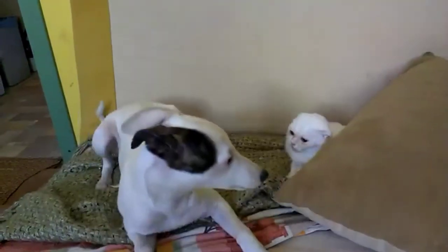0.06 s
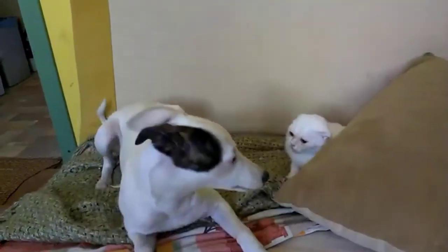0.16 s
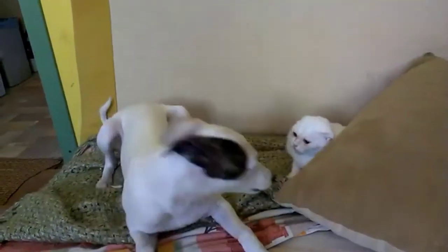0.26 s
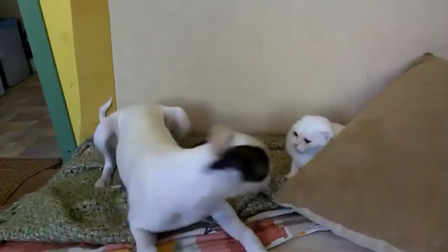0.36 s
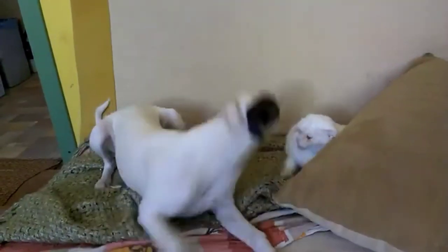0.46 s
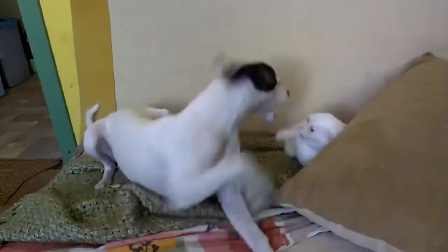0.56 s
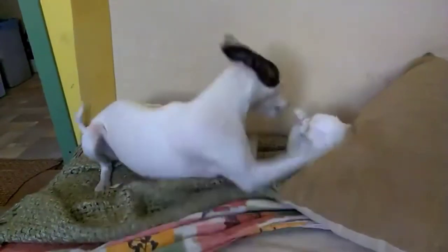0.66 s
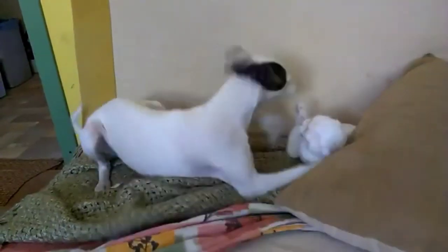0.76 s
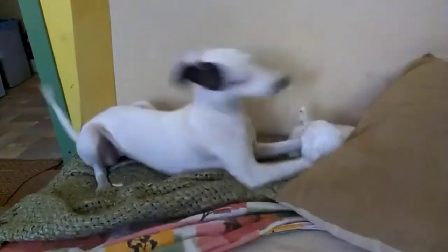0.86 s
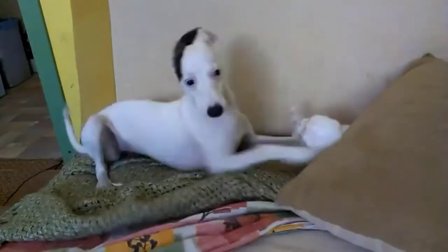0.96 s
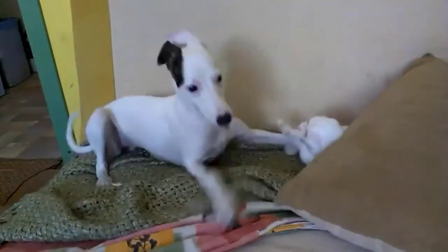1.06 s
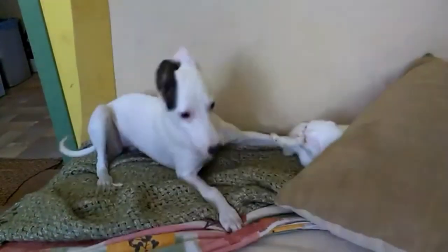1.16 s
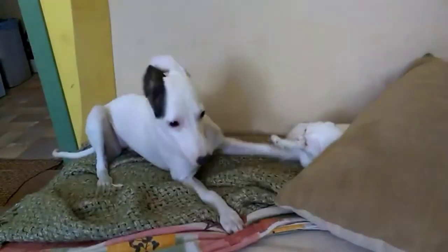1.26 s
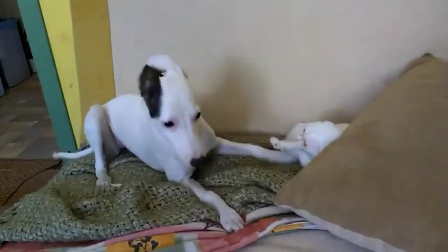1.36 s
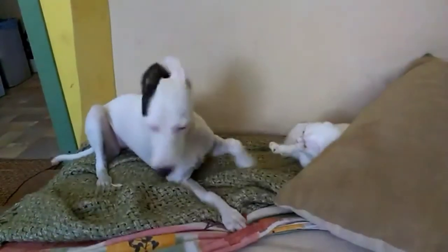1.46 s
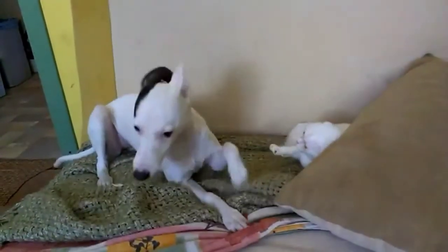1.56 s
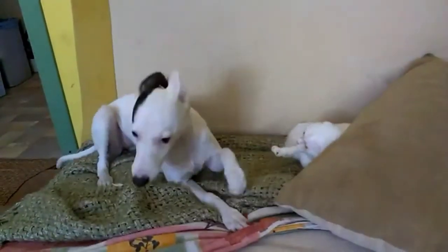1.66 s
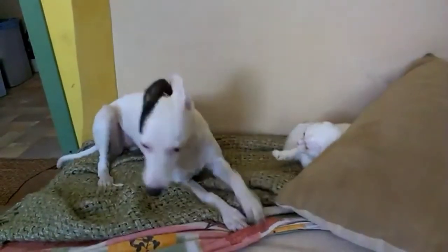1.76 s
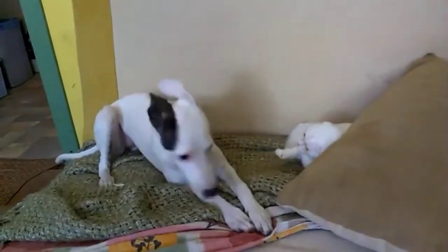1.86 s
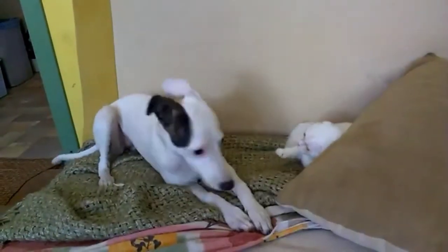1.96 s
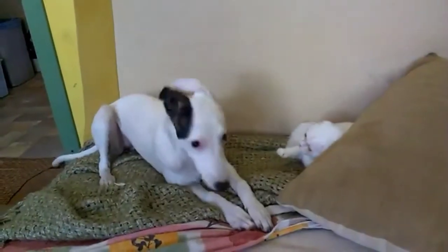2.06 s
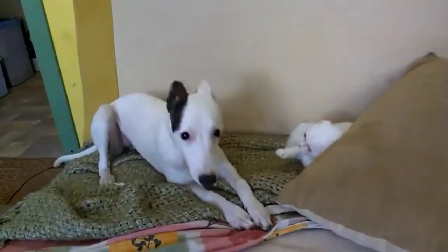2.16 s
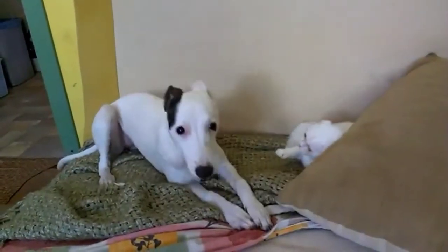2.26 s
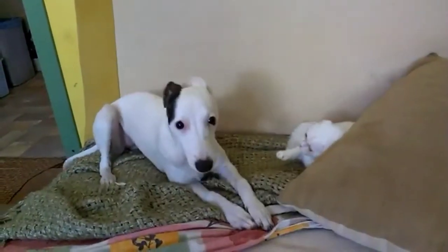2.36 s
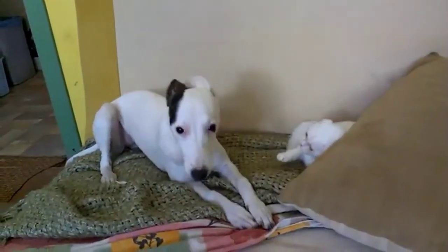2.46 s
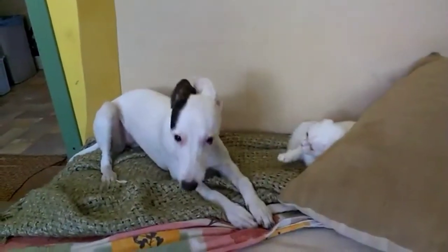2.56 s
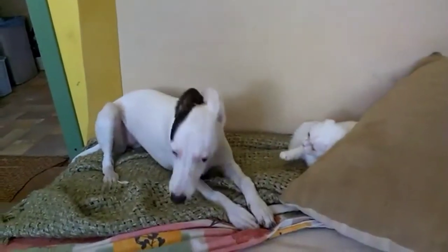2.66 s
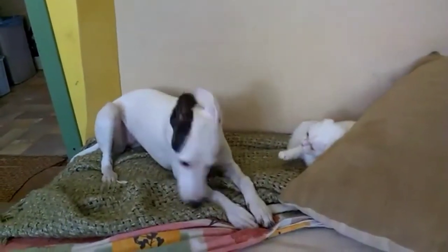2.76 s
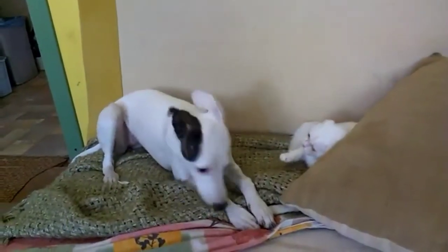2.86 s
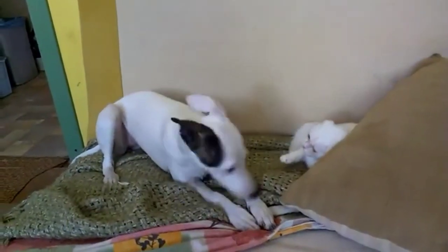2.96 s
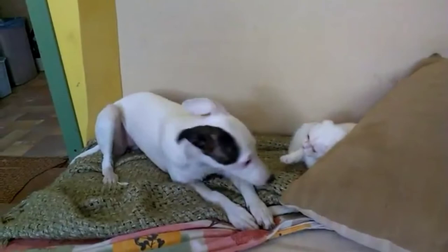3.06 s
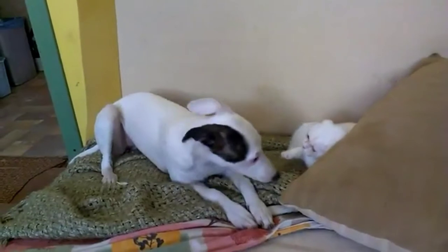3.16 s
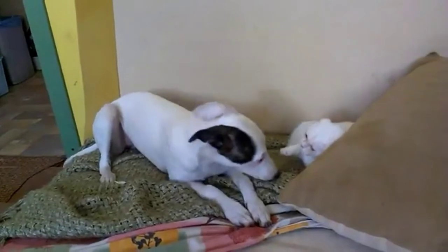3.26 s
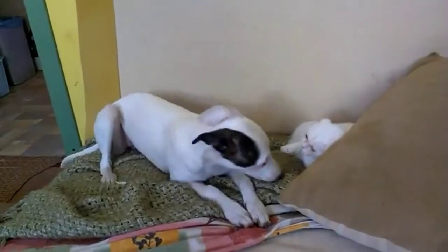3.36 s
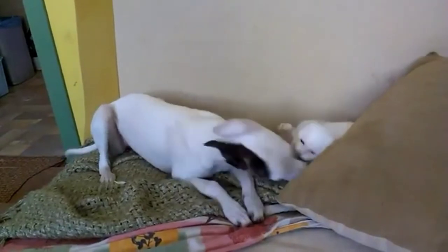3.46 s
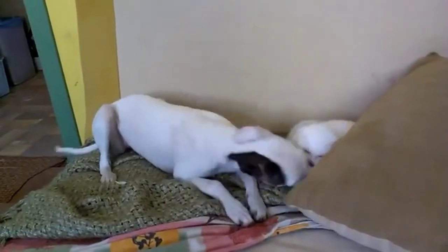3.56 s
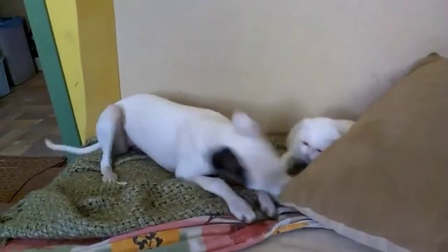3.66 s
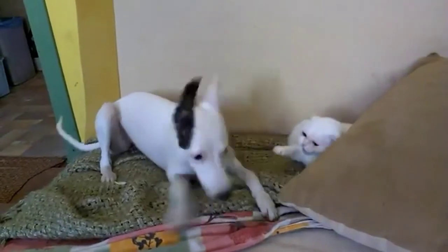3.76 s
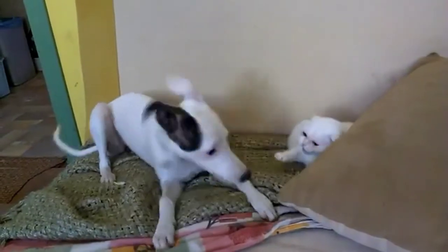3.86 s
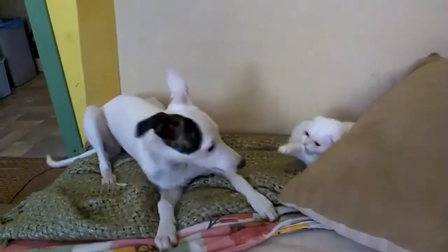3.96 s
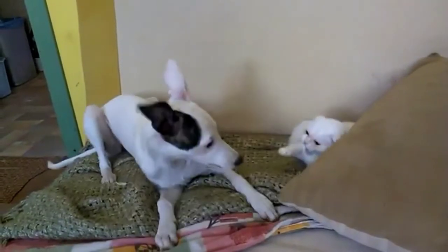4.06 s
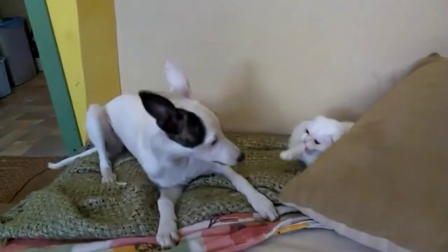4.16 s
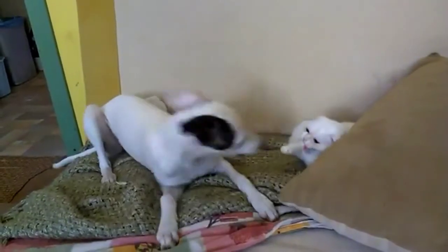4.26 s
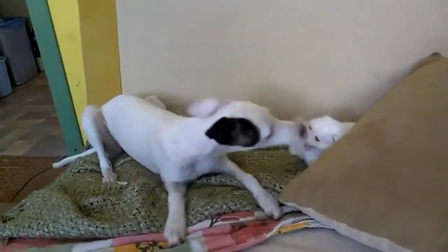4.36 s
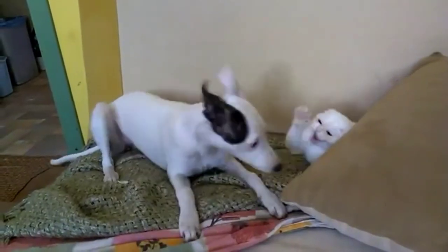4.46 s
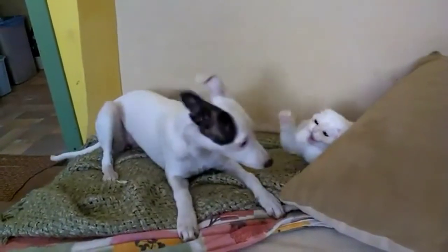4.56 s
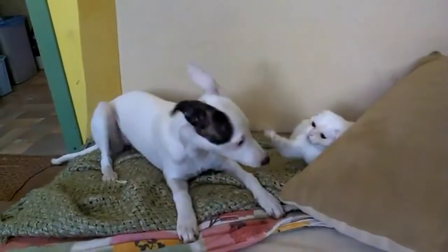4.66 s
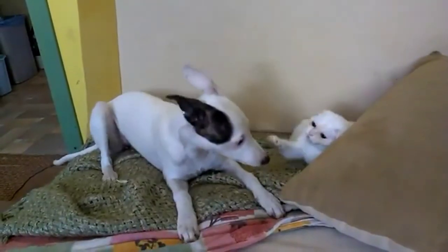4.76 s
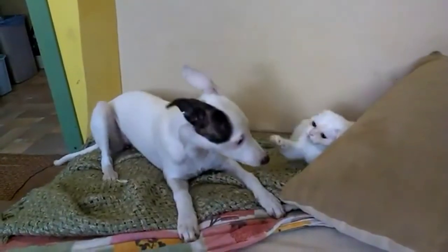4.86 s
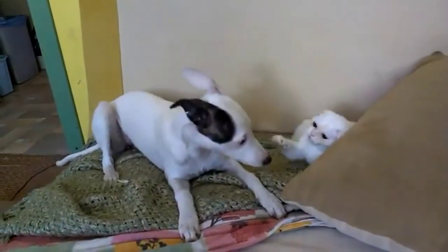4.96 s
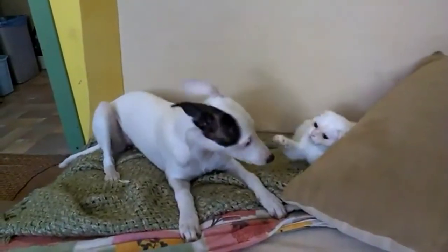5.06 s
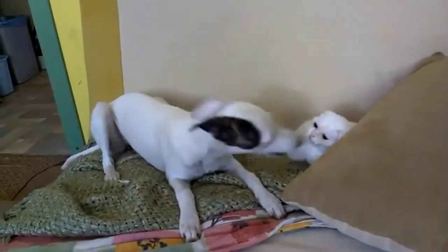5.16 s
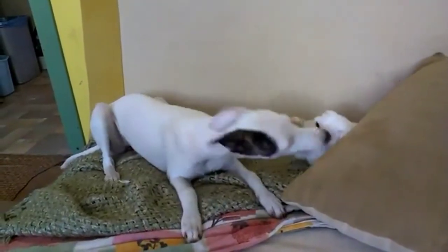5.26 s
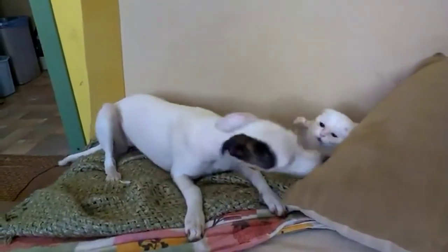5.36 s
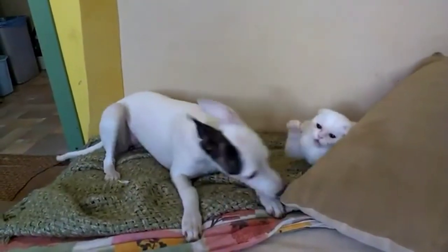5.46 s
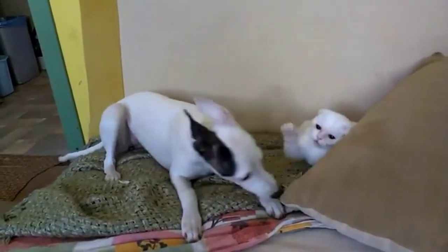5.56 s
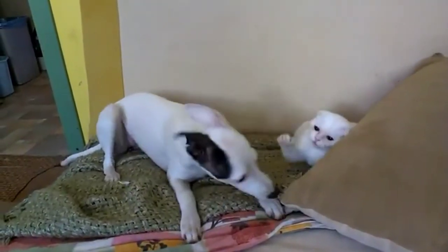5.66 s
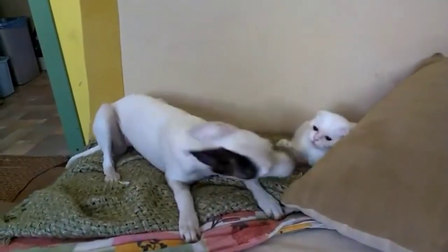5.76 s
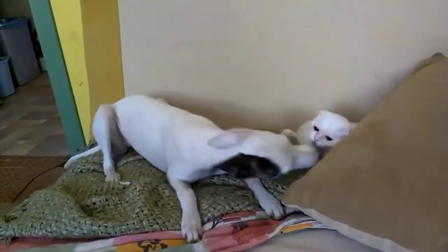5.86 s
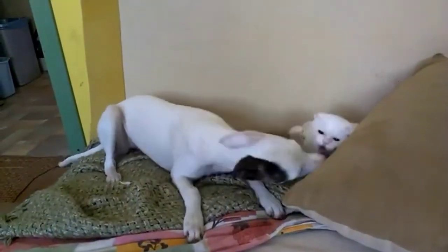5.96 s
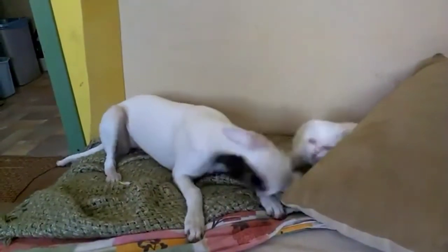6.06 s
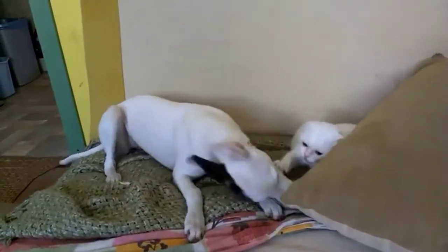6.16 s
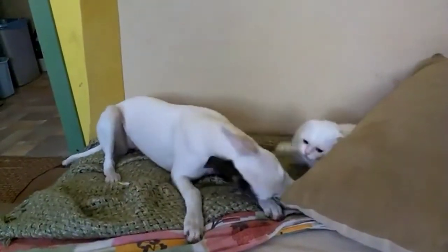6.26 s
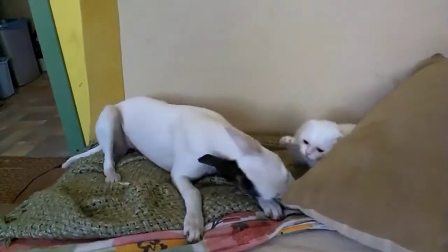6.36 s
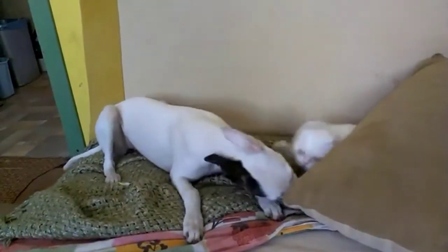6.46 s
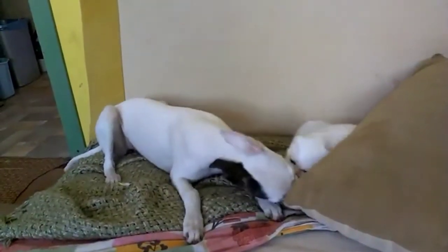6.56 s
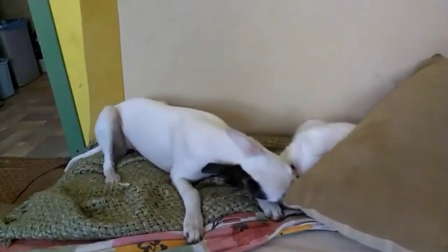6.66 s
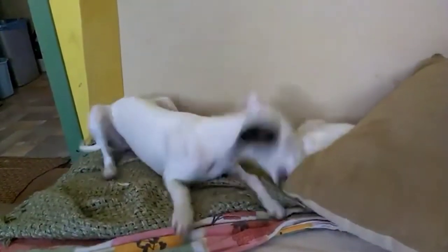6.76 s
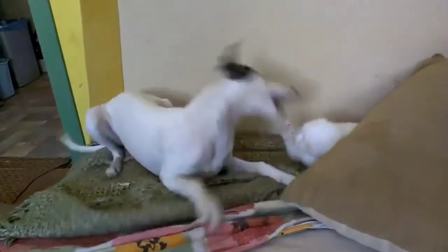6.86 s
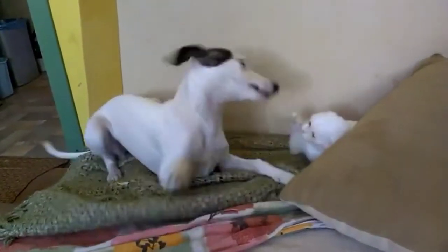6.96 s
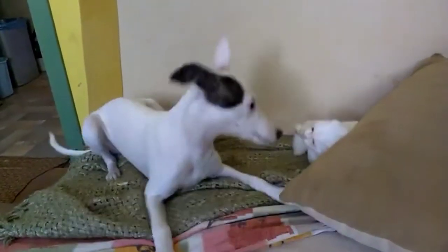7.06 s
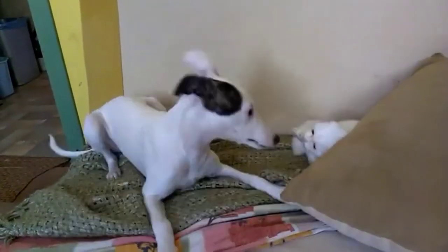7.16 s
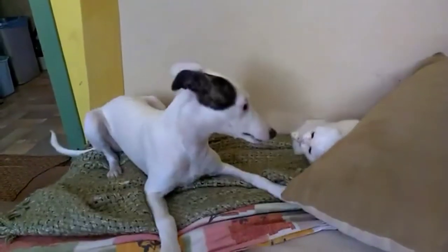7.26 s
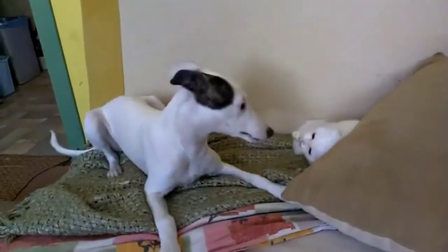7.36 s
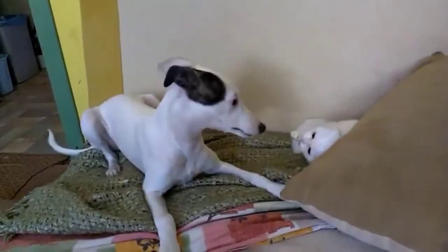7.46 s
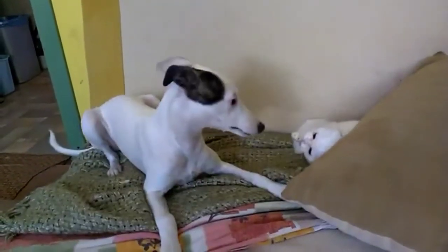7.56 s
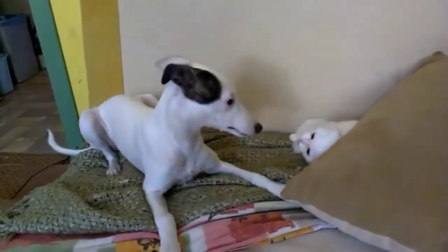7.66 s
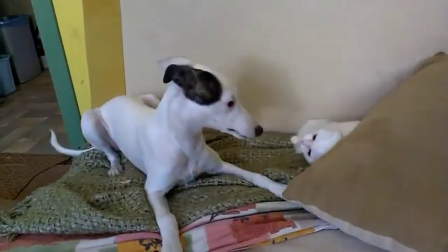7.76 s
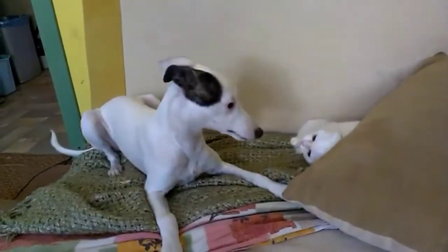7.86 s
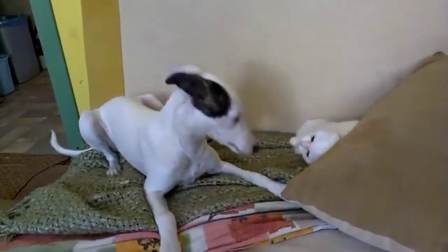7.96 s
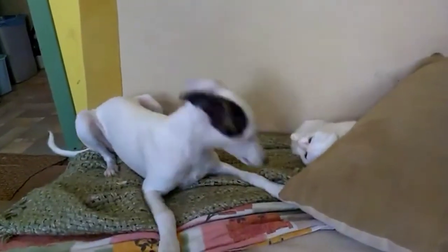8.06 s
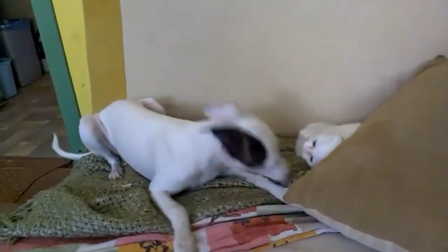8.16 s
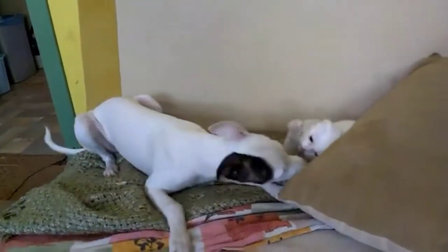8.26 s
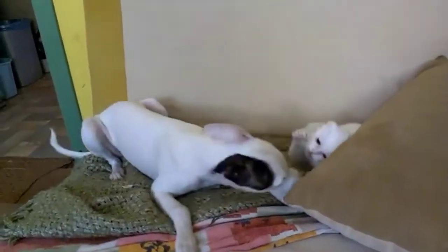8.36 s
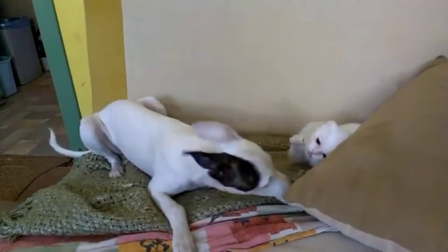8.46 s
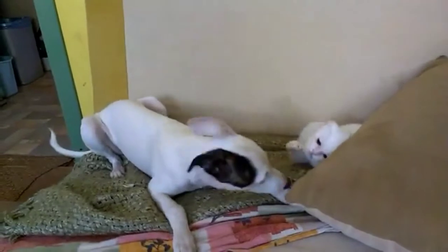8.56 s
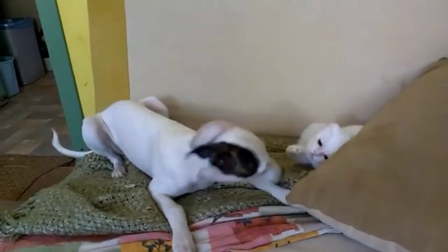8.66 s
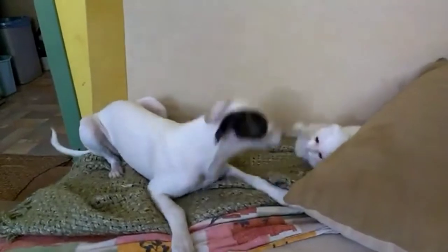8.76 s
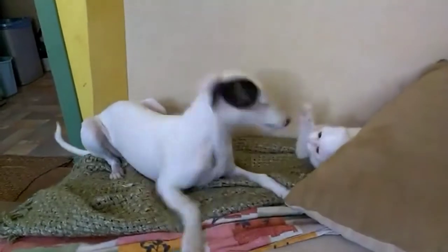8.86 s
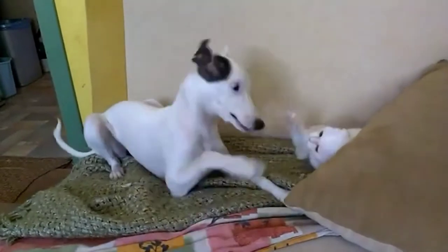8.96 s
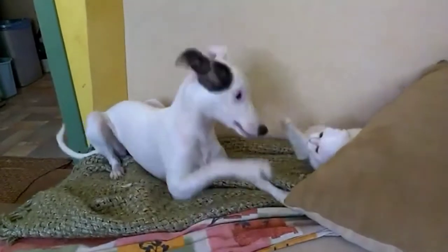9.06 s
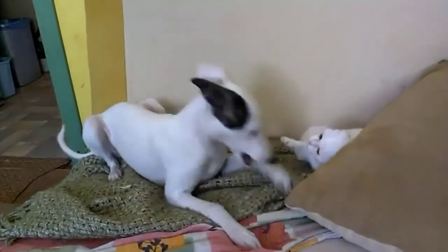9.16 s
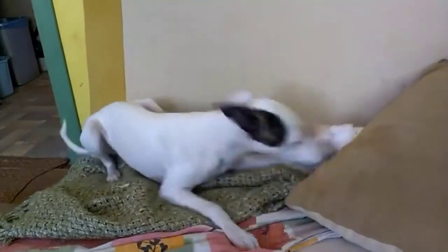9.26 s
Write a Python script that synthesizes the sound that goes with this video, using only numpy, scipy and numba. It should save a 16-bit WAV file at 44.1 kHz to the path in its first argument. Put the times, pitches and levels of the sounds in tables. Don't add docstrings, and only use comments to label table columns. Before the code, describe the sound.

A kitten close to the microphone in a small, soft, quiet room growls low and fluttery, then bursts into a loud full yowl. A hushed gap with faint sniffs and ticks follows, then two short yowls, quiet sniffing, another growl bending into a moan, a piercing double shriek and harsh spitting hisses with a weak falling yowl. Paws thump softly on bedding; a low growl closes it.

```python
import sys
import numpy as np
from scipy import signal
from scipy.fft import rfft, irfft, next_fast_len
from scipy.io import wavfile
from scipy.ndimage import uniform_filter1d
from numba import njit

SR = 44100
rng = np.random.default_rng(int(sys.argv[2]) if len(sys.argv) > 2 else 0)


def bounce(signal):
    frames = np.transpose(np.atleast_2d(signal))
    limited = np.clip(frames, -1, 1)
    pcm = np.round(limited * 32767).astype(np.int16)
    wavfile.write(sys.argv[1], SR, pcm)


def ratio(d):
    e = np.asarray(d, float) / 20
    return 10 ** e


N = 411012

SHUT_BELOW_DB = -58
WANDER_DB = 2.5


def pitch():
    # (time [s], rate [pulses/s])
    yowls = [
        [(.8, 260), (.91, 380), (.94, 465), (1.0, 510), (1.07, 565), (1.13, 500), (1.19, 410), (1.24, 280),
         (1.3, 200)],
        [(3.43, 215), (3.48, 220), (3.55, 295), (3.62, 298)],
        [(3.69, 230), (3.75, 285), (3.8, 395), (3.82, 395), (3.87, 215)],
        [(6.13, 200), (6.22, 250), (6.3, 215), (6.4, 195), (6.58, 190)],
        [(6.65, 290), (6.73, 335), (6.775, 430), (6.86, 330), (6.9, 365), (6.935, 440), (6.98, 260)],
        [(7.27, 390), (7.4, 400), (7.47, 385), (7.51, 345), (7.58, 293), (7.66, 265)],
    ]
    growl_hz = 143.1
    settle_s = .08
    rows = [(0, growl_hz), (yowls[0][0][0] - settle_s, growl_hz)]
    for yowl, after in zip(yowls, [*yowls[1:], [[N / SR]]]):
        rows += yowl
        end, next_start = yowl[-1][0], after[0][0]
        if next_start - end > 2 * settle_s:
            rows += [(end + settle_s, growl_hz), (next_start - settle_s, growl_hz)]
    return in_time(rows)[0]


def breath():
    # (start [s], end [s])
    breaths = [
        (-.02, 1.65),
        (2.685, 3.41),
        (3.425, 3.59),
        (3.7, 3.865),
        (5.64, 6.58),
        (6.6, 6.985),
        (7.3, 7.36),
        (7.37, 7.62),
        (8.338, 9.4),
    ]
    # (at start [dB], at end [dB])
    breath_db = [(-51, -50), (-57.5, -55), (-48, -53.5), (-47, -49), (-57, -50.5), (-53, -42.5),
                 (-48.5, -47.5), (-45, -54), (-56, -53)]
    return np.max([held(*span, *db) for span, db in zip(breaths, breath_db)], axis=0)


def effort():
    # (peak [s], level [dB], rise [s per 20 dB], fall [s per 20 dB], upper resonance above low [dB])
    surges = [(0, -55, .1, 1.67, 1.5), (.55, -50, 0.051, 0.8, 3), (.87, -44, 0.14, 0.06, 9.5),
              (.956, -25.5, 0.056, 0.1756, -1.5), (1.08, -23.5, 0.058, 0.1079, -4),
              (1.2, -36, 0.17, 0.25, 2), (3.45, -63, 0.034, 0.2, -9.5), (3.58, -65, 0.23, 0.72, 8),
              (3.728, -32.5, 0.028, 0.2159, 1), (3.83, -27.5, 0.071, 0.0558, -4),
              (3.93, -65.5, 0.13, .15, -5.5), (5.99, -54.5, .01, -0.3, 3), (6.14, -44.5, 0.15, -0.7, -2.5),
              (6.27, -41, .12, 0.08, -6), (6.4, -40, 0.16, 0.05, 0), (6.55, -38, 0.15, 0.23, -5),
              (6.705, -43, 0.058, 0.45, 7.5), (6.78, -32, 0.08, .25, 1), (6.89, -33.5, 0.089, 0.37, -10),
              (6.936, -19, 0.037, 0.0235, 6.5), (8.345, -52, .015, 0.33, 2.5), (8.55, -61.5, 0.43, .5, 6.5),
              (8.9, -47.5, 0.052, .5, -2), (9.06, -46.5, 0.37, .2, 1.5)]
    return swells(surges)


def folds(rate, effort_db):
    # (time [s], level [dB])
    alternation = [(7.25, 3), (7.33, 14), (7.46, 10.5), (7.49, -0.5)]
    alternate_db, = in_time(alternation)
    growl_uneven, yowl_uneven, leak_uneven = .038, .013, .08
    growl_air = .45
    taut = np.clip(1 + (rate - 240) / 50, 0, 1)
    leak = np.clip(.024 * (-20 - effort_db), .05, .85)
    taut_uneven = yowl_uneven + leak_uneven * leak ** 2 * (effort_db > SHUT_BELOW_DB)
    uneven = growl_uneven + taut * (taut_uneven - growl_uneven)
    air = growl_air + taut * (leak - growl_air)

    rate = rate * (1 + .045 * (1 - taut) * drift(3))
    slack = np.clip((225 - rate) / 85, 0, 1)
    flutter_hz = 59.25 * (1 + 0.038 * drift(6))
    swing = np.sin(2 * np.pi * np.cumsum(flutter_hz) / SR)
    turns = np.cumsum(rate * (1 + .4 * slack * swing + uneven * drift(90))) / SR

    at = np.flatnonzero(np.diff(np.floor(turns)) > 0)
    late = (np.floor(turns[at + 1]) - turns[at]) / (turns[at + 1] - turns[at])
    chance_db = uneven[at] * 51 * rng.standard_normal(N)[at]
    size = ratio(chance_db + alternate_db[at] * (np.arange(len(at)) % 2))
    pulses = np.zeros(N + 1)
    pulses[at] += size * (1 - late)
    pulses[at + 1] += size * late
    pulses = pulses[:N]

    puff = signal.lfilter([1], [1, -np.exp(-1 / (.002 * SR))], pulses)
    noise = rng.standard_normal(N) * (evened(puff) + .2)
    return evened(pulses), noise, air, slack


def throat(pulses, noise, slack, rate, breath_db, effort_db):
    # (centre [Hz], width [Hz], level [dB])
    modes = [(131.2, 22.6, -9), (211, 25, -1), (285.3, 48, 4.5), (463, 46.7, -2), (912, 52, -6.5)]
    thinning_db = .06 * np.maximum(rate - 420, 0)
    jaw_db = -5.5 + 0.49 * (effort_db + 43) + 2.5 * np.minimum(effort_db - SHUT_BELOW_DB, 0)
    jaw_db = np.maximum(jaw_db, -27) + thinning_db
    level_db = breath_db - thinning_db + WANDER_DB * drift(14)

    source = pulses + .09 * noise
    growl = sum(ratio(db) * formant(source, hz, width) for hz, width, db in modes)
    nose_db = -1.5 - 0.47 * np.clip(jaw_db + 22.5, -22, 10)
    growl = growl + ratio(nose_db) * formant(source, 652, 180)
    yowl = formant(source + 0.27 * noise, 310, 420)
    low = slack * evened(growl) + (1 - slack) * evened(yowl)
    third = formant(pulses + 0.25 * noise, 1143, 310)
    return ratio(level_db) * (evened(low) + ratio(jaw_db) * evened(third))


def mouth(pulses, noise, air, level_db, upper_db):
    # (time [s], low resonance [Hz], upper resonance [Hz])
    jaw = [
        [(0.0, 1840, 3760), (0.432, 1980, 3830), (0.532, 2830, 3900), (0.77, 2150, 3940), (0.906, 2875, 4500),
         (1.158, 2670, 3780), (1.492, 1850, 3860), (1.62, 1910, 4100)],
        [(3.4, 2750, 4680), (3.666, 2460, 3900), (3.84, 2783, 3790), (4.06, 2530, 3980)],
        [(5.96, 2900, 4170), (6.034, 2050, 3990), (6.634, 2450, 3820), (6.736, 2658, 4300), (7.0, 3010, 4110)],
        [(8.32, 2314, 3975), (8.722, 1780, 3962), (9.024, 2450, 4020), (9.2, 1832, 4020), (9.32, 1796, 4200)],
    ]
    low_hz, upper_hz = in_time(np.vstack(jaw))
    wander = 0.05
    low_hz = low_hz * (1 + wander * drift(9))
    upper_hz = upper_hz * (1 + wander / 3 * drift(9))
    upper_db = upper_db + WANDER_DB * drift(12)

    source = np.sqrt(1 - air) * pulses + np.sqrt(air) * noise
    breathy = source + .3 * noise
    upper = formant(breathy, upper_hz, 673) - ratio(-17) * formant(breathy, 5650, 800)
    over_db = np.clip(level_db + upper_db + 56, 0, 40)
    edge_db = -19 - .8 * over_db
    upper = upper + ratio(edge_db) * formant(breathy, np.minimum(3.6 * low_hz, 8100), 800)
    lower = formant(source, low_hz, 400) + .4 * formant(source, .8 * low_hz, 450)
    bright = evened(lower, .02) - ratio(upper_db) * evened(upper, 0.014)
    band = signal.butter(6, [1300, 8800], "band", fs=SR, output="sos")
    return signal.sosfilt(band, ratio(level_db) * bright)


def hiss():
    # (peak [s], level [dB], rise [s per 20 dB], fall [s per 20 dB], resonance [Hz])
    puffs = [(1.7, -63.5, .15, -0.6, 4900), (2.05, -72, .5, -1, 4570), (2.93, -65.5, 0.28, 0.3, 4850),
             (4.4, -50, 0.23, 0.22, 5570), (4.52, -45, 0.34, 0.16, 4150), (4.68, -53.5, 0.47, 0.04, 5700),
             (5.48, -54.5, .13, 0.28, 3870), (6.978, -23.5, 0.037, 0.1125, 5850),
             (7.105, -25.5, .03, 0.14, 5800), (7.158, -24, 0.091, 0.1139, 4144),
             (7.3, -24, 0.074, 0.1426, 4130), (7.4, -22.5, 0.073, 0.137, 5930),
             (7.48, -30, .2, 0.177, 4900), (8.27, -52.5, 0.094, 0.2, 5400)]
    # (peak [s], level [dB], rise [s per 20 dB], fall [s per 20 dB])
    gapes = [
        (1.8, -81, .3, -2),
        (4.36, -59, 0.13, 0.35),
        (4.67, -59, 0.67, -0.08),
        (6.97, -48, 0.033, 0.06),
        (7.1, -50.5, 0.044, 0.14),
        (7.39, -46, 0.088, 0.31),
        (8.27, -67.5, .08, 0.37),
    ]
    # (frequency [Hz], density [dB per Hz])
    air_spectrum = [(530, -58.5), (900, -47.5), (2100, -10.5), (3110, -10), (3900, -1.5), (6200, -7),
                    (8500, -29), (11000, -52.5), (18700, -120)]
    # (frequency [Hz], density [dB per Hz])
    top_spectrum = [(4120, -21.5), (7000, -5.5), (7480, -9), (15500, -32)]
    level_db, centre_hz = swells(puffs)
    gape_db, = swells(gapes)
    air = coloured(air_spectrum)
    body = evened(air + 1.3 * formant(air, centre_hz, 1200))
    lows = rms_one(formant(rng.standard_normal(N), 1320, 860))
    wide = coloured(top_spectrum) + 0.79 * lows
    lumps = ratio(1.62 * drift(25))
    return lumps * (ratio(level_db) * body + ratio(gape_db) * wide)


def whistles():
    # (start [s], end [s], pitch at start [Hz], pitch at end [Hz], level [dB])
    glides = [
        (.493, .55, 4100, 3850, -41),
        (.535, .6, 3400, 2750, -50),
        (1.67, 1.87, 2160, 2840, -73),
        (2.1, 2.32, 2200, 2130, -75),
        (4.085, 4.13, 3650, 3500, -54),
        (4.15, 4.19, 2600, 2400, -58),
        (4.2, 4.27, 3400, 3300, -62),
        (4.24, 4.28, 2500, 2200, -61),
        (4.47, 4.53, 810, 730, -54),
        (5.98, 6.02, 1300, 1285, -51),
    ]
    out, white = np.zeros(N), rng.standard_normal(N)
    shaky_db = 4.9 * drift(25)
    for start, end, first_hz, last_hz, db in glides:
        near = slice(int((start - .1) * SR), int((end + .15) * SR))
        hz = in_time([(start, first_hz), (end, last_hz)])[0][near]
        level_db = held(start, end, db, db - 4.0) + shaky_db
        out[near] += ratio(level_db)[near] * evened(formant(white[near], hz, first_hz * .04))
    return out


def knocks():
    # (time [s], peak [dB], ring [Hz])
    ticks = [(0.6934, -24.5, 5470), (0.82, -29, 4430), (1.9399, -40, 3600), (2.0534, -47.5, 3880),
             (2.7876, -52, 4990), (2.8623, -41.5, 5686), (2.8898, -48.5, 2140), (2.9426, -41.5, 4280),
             (3.04, -50, 4950), (5.3717, -40, 4300), (5.9797, -28, 4250), (8.0247, -47.5, 4637),
             (8.1922, -44.5, 5200)]
    # (time [s], peak [dB], push [Hz], decay by 60 dB [s])
    thumps = [
        (0.78, -36, 190, 0.08),
        (1.871, -48, 107, 0.032),
        (3.768, -50, 380, 0.085),
        (6.138, -47, 185, 0.1),
        (6.9, -46.5, 394, 0.091),
        (7.101, -35.5, 126.8, 0.068),
        (7.138, -46, 72.8, 0.1),
        (9.219, -42, 200, 0.063),
    ]
    out, t = np.zeros(N), np.arange(int(.25 * SR)) / SR
    tick_band = signal.butter(4, [2000, 6400], "band", fs=SR, output="sos")
    for s, db, hz in ticks:
        scrape = rng.standard_normal(len(t)) * ratio(-60 * t / 0.011)
        ring = np.sin(2 * np.pi * hz * t) * ratio(-60 * t / 0.01)
        snap = signal.sosfilt(tick_band, scrape + ring)
        out[round(s * SR):][:len(t)] += ratio(db) * snap / np.abs(snap).max()
    dull = signal.butter(3, 900, fs=SR, output="sos")
    for s, db, hz, t60 in thumps:
        puff = rms_one(signal.sosfilt(dull, rng.standard_normal(len(t))))
        push = np.sin(2 * np.pi * hz * t) + 0.22 * np.sin(2 * np.pi * hz * 0.21 * t) + 0.96 * puff
        shape = (1 - np.exp(-t / 0.0006)) * ratio(-60 * t / t60)
        out[round(s * SR):][:len(t)] += (ratio(db) * push * shape)[:N - round(s * SR)]
    return out


def room(x):
    t60_s, cut_hz = .3, 5000
    size = next_fast_len(N + SR)
    w = 2 * np.pi * np.fft.rfftfreq(size, 1 / SR)
    dull = 1 / (1 + 1j * w / (2 * np.pi * cut_hz))
    answer = 0
    for k, lag in enumerate(rng.uniform(.007, .03, 10)):
        loop = ratio(-60 * lag / t60_s) * dull * np.exp(-1j * w * lag)
        answer = answer + (-1) ** k * loop / (1 - loop)
    return irfft(rfft(x, size) * answer, size)[:N]


def quiet_floor():
    # (frequency [Hz], density [dB per Hz])
    floor_spectrum = [(20, 0), (35, -5.5), (60, -6), (120, -7.5), (200, 0), (400, -0.5), (1000, -3.5),
                      (2000, -9), (4000, -11.5), (5500, -11), (8000, -23.5), (12000, -24), (15700, -35.5)]
    return ratio(-64.5 + 0.75 * drift(3.4)) * coloured(floor_spectrum)


def rms_one(x):
    return x / np.sqrt(np.mean(x ** 2) + 1e-20)


def in_time(rows):
    s, *columns = np.transpose(rows)
    return [np.interp(np.arange(N) / SR, s, c) for c in columns]


def drift(rate_hz):
    r = np.exp(-2 * np.pi * rate_hz / SR)
    return rms_one(signal.lfilter([1], [1, -2 * r, r * r], rng.standard_normal(N + SR))[SR:])


@njit
def resonate(x, turn, width, sr):
    y = np.zeros(len(x))
    r = np.exp(-np.pi * width / sr)
    for i in range(2, len(x)):
        y[i] = (1 - r * r) / 2 * (x[i] - x[i - 2]) + r * turn[i] * y[i - 1] - r * r * y[i - 2]
    return y


def formant(x, hz, width_hz):
    turn = 2 * np.cos(2 * np.pi * (np.zeros(len(x)) + hz) / SR)
    once = resonate(x, turn, width_hz, SR)
    return resonate(once, turn, width_hz * 1.7, SR)


def evened(x, span_s=0.028):
    size = int(span_s * SR)
    power = uniform_filter1d(uniform_filter1d(x ** 2, size), size)
    return x / np.sqrt(power + 1e-14)


def coloured(spectrum):
    size = next_fast_len(N)
    hz, points = np.fft.rfftfreq(size, 1 / SR) + 1, np.array(spectrum)
    shape = ratio(np.interp(np.log(hz), np.log(points[:, 0]), points[:, 1], -90, -90))
    return rms_one(irfft(rfft(rng.standard_normal(size)) * shape, size)[:N])


def held(start, end, first_db, last_db):
    attack_s, release_s = .012, .045
    s = [start - 2 * attack_s, start - attack_s, start, end, end + release_s, end + 2 * release_s]
    return np.interp(np.arange(N) / SR, s, [-120, first_db - 30, first_db, last_db, last_db - 30, -120])


def swells(rows):
    t = np.arange(0, N + 64, 64) / SR
    s, db, rise, fall, *columns = np.transpose(rows)[:, :, None]
    away = np.maximum((s - t) / np.abs(rise), (t - s) / np.abs(fall))
    power = ratio(db - 20 * away ** 1.14) ** 2 + 1e-14
    total = power.sum(axis=0)
    averages = [(power * c).sum(axis=0) / total for c in columns]
    return in_time(np.transpose([t, 10 * np.log10(total), *averages]))


def scene():
    rate, breath_db = pitch(), breath()
    effort_db, upper_db = effort()
    pulses, noise, air, slack = folds(rate, effort_db)
    voice = throat(pulses, noise, slack, rate, breath_db, effort_db)
    voice = voice + mouth(pulses, noise, air, effort_db, upper_db)
    near = voice + hiss() + whistles() + knocks()
    return (near + ratio(-16) * room(near) + quiet_floor())[None, :]


def top_cut(x):
    return signal.sosfilt(signal.butter(12, 15670, fs=SR, output="sos"), x)


def record(dry):
    mix = dry + .0025
    return top_cut(mix)


dry = scene()
out = record(dry)
bounce(out)
```